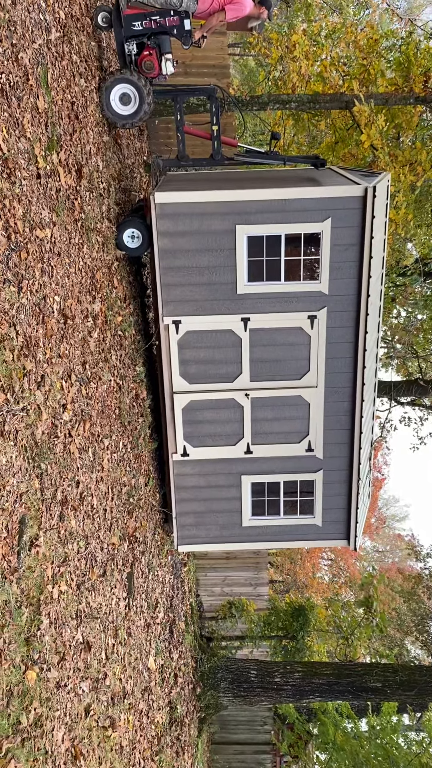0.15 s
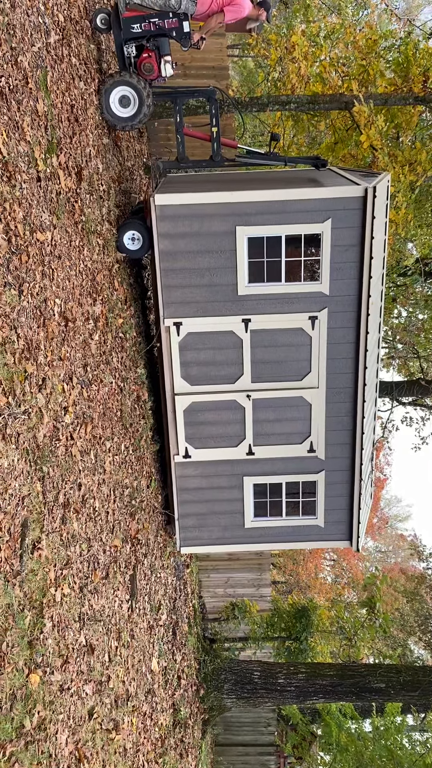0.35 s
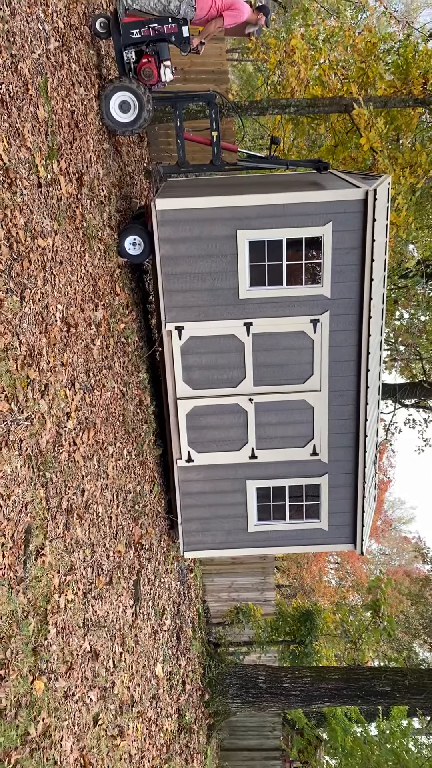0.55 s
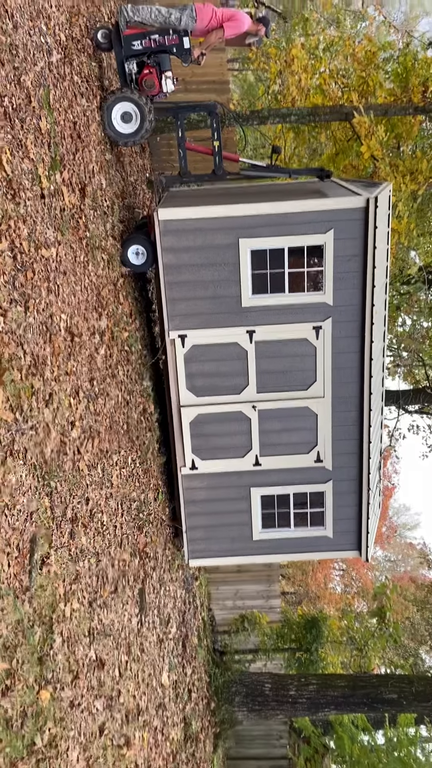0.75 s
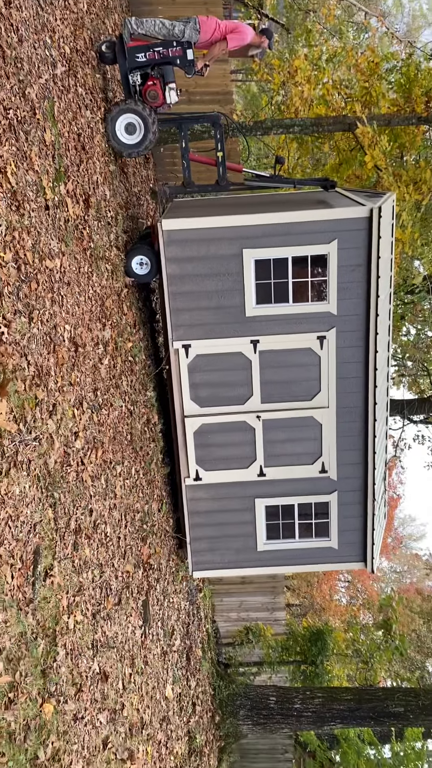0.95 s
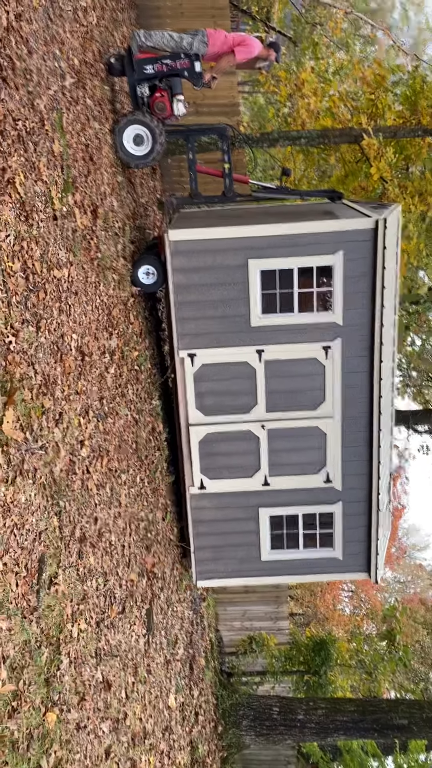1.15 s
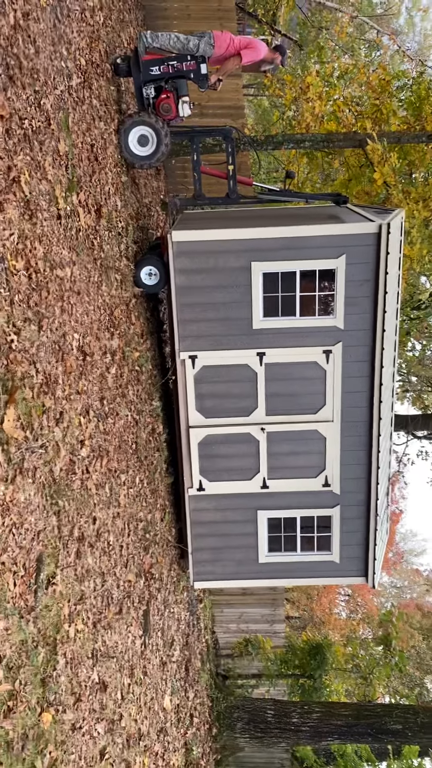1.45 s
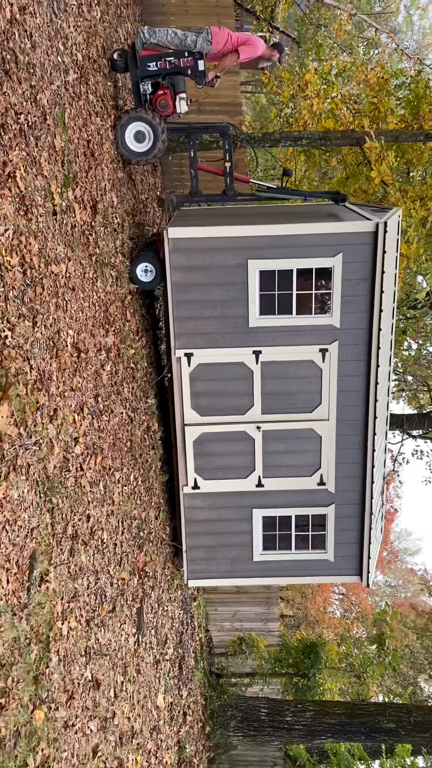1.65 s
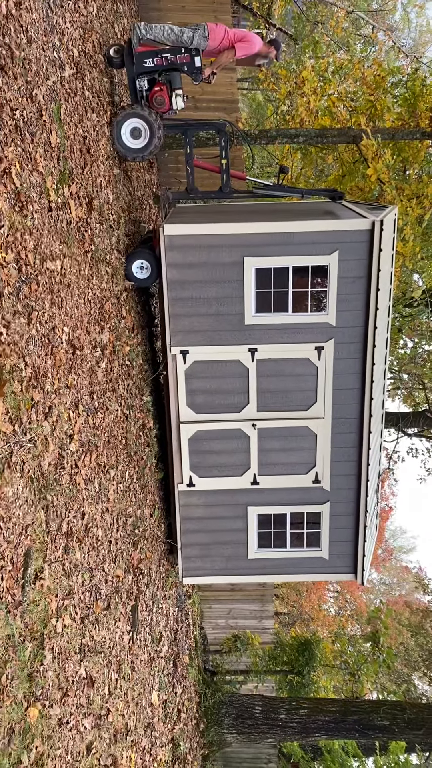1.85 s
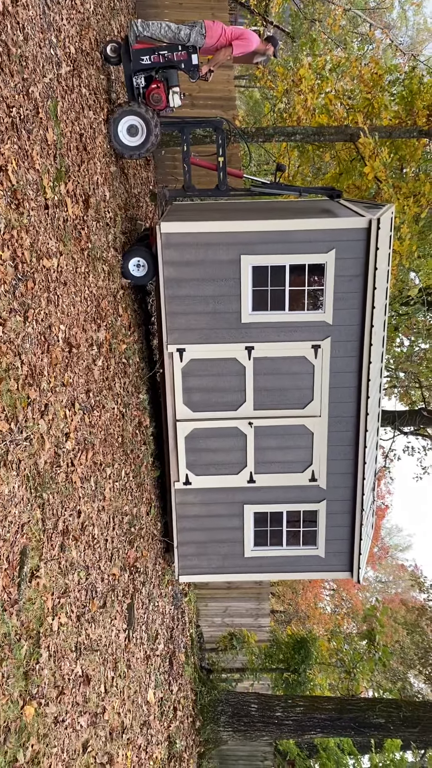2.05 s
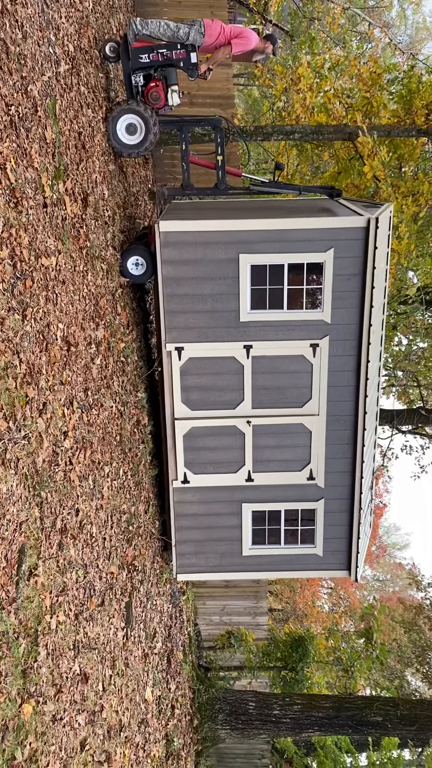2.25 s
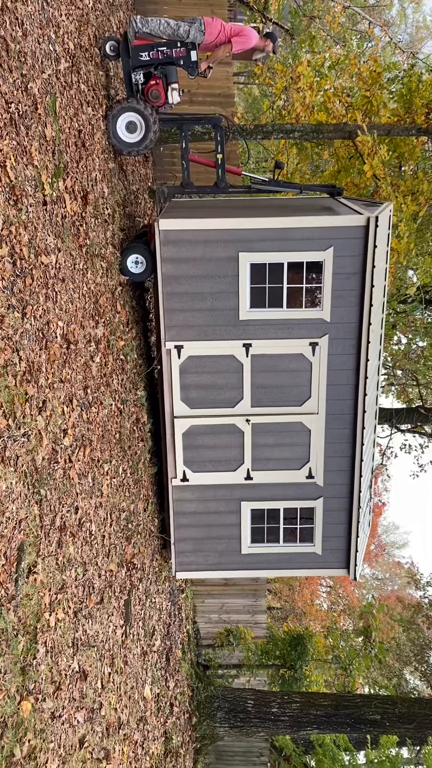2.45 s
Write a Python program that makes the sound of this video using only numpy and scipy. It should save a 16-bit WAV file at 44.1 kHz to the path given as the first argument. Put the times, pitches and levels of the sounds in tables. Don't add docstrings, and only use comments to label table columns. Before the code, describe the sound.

Outdoors in a leafy yard, a compact tractor-like mover holds one engine speed throughout, humming and whining with metal rattle and airy rush; a low knock comes early, leaf snaps are scattered, and breeze buffets the handheld microphone.

```python
import sys
import numpy as np
from scipy import signal
from scipy.fft import rfft, irfft
from scipy.io import wavfile
from scipy.ndimage import uniform_filter1d

SR = 44100
rng = np.random.default_rng(int(sys.argv[2]) if len(sys.argv) > 2 else 0)


def wrap_up_sound(samples):
    columns = np.atleast_2d(samples).T
    tamed = np.clip(columns, -1, 1)
    steps = np.round(tamed * 32767).astype(np.int16)
    wavfile.write(sys.argv[1], SR, steps)


def attenuation_scalar(level_db):
    decades = np.asarray(level_db, float) / 20
    return 10 ** decades


N = 114660


def rms_one(x):
    return x / np.sqrt(np.mean(x ** 2) + 1e-20)


def curve(rows):
    time_s, value = np.transpose(rows)
    return np.interp(np.arange(N) / SR, time_s, value)


def at_hz(points, hz):
    point_hz, value = np.transpose(points)
    return np.interp(np.log(hz + 1), np.log(point_hz), value)


def drift(rate_hz):
    r = np.exp(-2 * np.pi * rate_hz * 40 / SR)
    white = rng.standard_normal(N // 40 + 2002)
    slow = signal.lfilter([1], [1, -2 * r, r * r], white)[2000:]
    return np.interp(np.arange(N) / 40, np.arange(len(slow)), rms_one(slow))


def resonate(x, hz, width_hz):
    r = np.exp(-np.pi * width_hz / SR)
    poles = [1, -2 * r * np.cos(2 * np.pi * hz / SR), r * r]
    return signal.lfilter([1, 0, -1], poles, x + 1e-18)


def cut(x, hz, kind, order=2):
    sos = signal.butter(order, np.clip(hz, 10, .45 * SR), kind, fs=SR, output="sos")
    return signal.sosfilt(sos, x)


FIRINGS_HZ, FIRST_FIRING_S = 19.3121, .00978
# time in seconds, crank lateness in ms.
CRANK_LATE = [(0, .4), (.11, .65), (.18, 1.25), (.28, 1.1), (.47, -.75), (.95, -.8), (1.15, -.5),
              (1.2, .55), (1.4, 1.15), (1.52, .3), (1.72, -.35), (1.95, 0), (2.23, -.6), (2.3, -.1),
              (2.5, .95), (2.6, 1.0)]


def cycles():
    late_s = uniform_filter1d(curve(CRANK_LATE), size=3000, mode="nearest") / 1000
    return (np.arange(N) / SR - late_s - FIRST_FIRING_S) * FIRINGS_HZ


def per_cycle(turn, spread_db):
    strength_db = spread_db * rng.standard_normal(61)
    return attenuation_scalar(np.interp(turn, np.arange(-1, 60), strength_db))


# multiple of the firing rate, level in dB.
EXHAUST_ORDERS = [(2, -54.5), (3, -52.5), (4, -38), (5, -30), (6, -38), (7, -39), (8, -33), (9, -36.5),
                  (10, -43.5), (11, -29.5), (12, -34), (13, -35), (14, -44), (15, -46), (16, -45.5),
                  (20, -52.5)]
# time in seconds, level in dB.
BOOM_LOAD = [(0, -7.5), (.15, -5), (.3, 0), (.6, -1.5), (1.2, .5), (1.9, 0), (2.6, 0)]
SILENCER_CHAMBERS = [(3, 2.7, 2.8), (5, 5.5, .7), (6, 5, 1.9), (10, 7, .24), (13, 12.2, .47), (20, 15, .1)]
FIRING_SPREAD_DB, ORDER_WANDER, BOOM_TOP_ORDER = 1.3, .19, 6


def exhaust(turn):
    out, load = 0, attenuation_scalar(curve(BOOM_LOAD))
    for order, db in EXHAUST_ORDERS:
        _, centre, lag = next(c for c in SILENCER_CHAMBERS if order <= c[0])
        wobble = 1 + ORDER_WANDER * (drift(10) + 1j * drift(10))
        ring = np.exp(2j * np.pi * order * turn - 1j * lag * (order - centre))
        boom = load if order <= BOOM_TOP_ORDER else 1
        out = out + attenuation_scalar(db) * boom * np.real(wobble * ring)
    return np.sqrt(2) * out * per_cycle(turn, FIRING_SPREAD_DB)


# multiple of the firing rate (rounded when played), level in dB, wander as a fraction.
PUMP_TONES = [
    (40, -40, 0.32),
    (41, -50, 0.58),
    (79.5, -77, 0.25),
    (118, -53, 0.34),
    (160, -51.5, 0.98),
]
WHINE_THROB_DB, WHINE_TOP_MS = 1, 35.5


def whine(turn):
    out = 0
    for order, db, wander in PUMP_TONES:
        wobble = 1 + wander * (drift(38) + 1j * drift(38))
        tone = np.exp(2j * np.pi * np.round(order) * turn)
        out = out + attenuation_scalar(db) * np.real(wobble * tone)
    throb = np.cos(2 * np.pi * (turn - WHINE_TOP_MS * FIRINGS_HZ / 1000))
    return np.sqrt(2) * out * attenuation_scalar(WHINE_THROB_DB * throb)


# delay after firing in ms, puff decay in ms, puff in dB, tick in dB.
VALVE_EVENTS = [
    (3.79, 8.0, 15, -1.5),
    (20.36, 3.6, 12, 0),
    (27.9, 3.0, -12.5, -6.5),
    (41, 4.0, 8.5, -17),
]
VALVE_SPREAD_DB = 3.0


def valve_gates(turn):
    puff, tick = np.zeros(N), np.zeros(N)
    for delay_ms, length_ms, puff_db, tick_db in VALVE_EVENTS:
        age_ms = ((turn - delay_ms * FIRINGS_HZ / 1000) % 1) * 1000 / FIRINGS_HZ
        strength = per_cycle(turn, VALVE_SPREAD_DB) * (1 - np.exp(-age_ms / 1.3))
        puff += attenuation_scalar(puff_db) * strength * np.exp(-age_ms / length_ms)
        tick += attenuation_scalar(tick_db) * strength * np.exp(-age_ms / 3.3)
    return puff, tick


PUFF_DB, PUFF_LOW_HZ, PUFF_HIGH_HZ, TICK_DB = -43.5, 7600, 10700, -58.5


def valves(puff, tick):
    air = rms_one(cut(rng.standard_normal(N) * puff, PUFF_LOW_HZ, "high"))
    metal = rms_one(cut(rng.standard_normal(N) * tick, [2500, 6500], "band"))
    return attenuation_scalar(PUFF_DB) * cut(air, PUFF_HIGH_HZ, "low") + attenuation_scalar(TICK_DB) * metal


# frequency in Hz, width in Hz, level in dB.
COWL_MODES = [(366.6, 31, -37), (429.5, 11.7, -45), (652, 70, -49.5), (828, 75, -46), (1046, 110, -47.5),
              (1208, 8.5, -50.5), (1352, 87, -45), (1520, 23, -66), (2132, 13, -56.5), (2387, 57, -51.5),
              (2940, 110, -49), (3083, 390, -44), (3840, 30, -52.5), (5134, 160, -51)]
# time in seconds, level in dB.
GROUND_SHAKE = [(0, -2), (.15, -0.5), (.3, -6.5), (.58, 0), (.78, 0.5), (1.1, -7), (1.35, 1), (1.55, -0.5),
                (1.85, 0.5), (2.15, -2), (2.35, -1.5), (2.55, 0)]
SHAKE_TOP_HZ = 1600


def cowl(tick):
    out, shake_db = 0, curve(GROUND_SHAKE)
    for hz, width_hz, db in COWL_MODES:
        drive = rng.standard_normal(N) * (1 + 0.9 * tick)
        level_db = db + 1.15 * drift(8.9) + shake_db * (hz < SHAKE_TOP_HZ)
        out = out + attenuation_scalar(level_db) * rms_one(resonate(drive, hz, width_hz))
    return out


# frequency in Hz, density in dB per Hz.
RUSH_SPECTRUM = [(60, 11), (250, 7), (520, -8), (1200, 0.5), (1800, -6), (4500, -12), (8000, -10),
                 (15500, -25.5)]
RUSH_DB = -34


def rush(tick):
    out, together = 0, drift(3)
    edges_hz = 50 * 2 ** np.arange(0, 8.6, .5)
    white = rng.standard_normal((2, N)) * (1 + .5 * tick)
    for k, (low, high) in enumerate(zip(edges_hz, edges_hz[1:])):
        level_db = at_hz(RUSH_SPECTRUM, np.sqrt(low * high))
        gain = attenuation_scalar(level_db + 1.4 * together + 1.4 * drift(6.5))
        out = out + gain * cut(white[k % 2], [low, high], "band")
    return attenuation_scalar(RUSH_DB) * rms_one(out)


# start in seconds, level in dB, pitch in Hz, t60 in seconds.
AXLE_BUMPS = [
    (0.358, -14, 91, .12),
    (0.822, -28, 147, 0.077),
    (1.19, -36, 81, .12),
]


def bumps():
    out, time_s = 0, np.arange(N) / SR
    for start_s, db, hz, t60_s in AXLE_BUMPS:
        age_s = np.maximum(time_s - start_s, 0)
        envelope = attenuation_scalar(db - 60 * age_s / t60_s) * (1 - np.exp(-age_s / .012))
        out = out + envelope * np.sin(2 * np.pi * hz * age_s)
    return out


# start in seconds, level in dB.
LEAF_SNAPS = [
    (.115, -37),
    (.43, -32),
    (.635, -28.5),
    (0.951, -48),
    (2.09, -42),
    (2.29, -27.5),
]
LEAVES_PER_S, LEAVES_DB = 150, -65


def leaves():
    sizes = attenuation_scalar(6.3 * np.minimum(rng.exponential(1, N), 5)) * rng.choice([-1, 1], N)
    born = rng.random(N) < LEAVES_PER_S * attenuation_scalar(5 * drift(6)) / SR
    out = attenuation_scalar(LEAVES_DB) * rms_one(sizes * born)
    decay = np.exp(-np.arange(400) / SR / .002)
    for start_s, db in LEAF_SNAPS:
        i = int(start_s * SR)
        out[i:i + 400] += attenuation_scalar(db) * rng.standard_normal(400) * decay
    return cut(out, 3000, "high")


# time in seconds, level in dB.
BREEZE = [(0.0, -69), (0.48, -54), (0.65, -59), (0.8, -33.5), (1.95, -41.5), (2.5, -36), (2.6, -39)]
WIND_TOP_HZ = 74.4


def wind():
    gusts = cut(rng.standard_normal(N), [42, WIND_TOP_HZ], "band")
    return attenuation_scalar(curve(BREEZE)) * rms_one(cut(gusts, 36, "high"))


# frequency in Hz, phase in radians.
PORT_LEAD = [(700, 0), (1100, -.8), (3200, 1.4), (5250, .15), (7150, 3.14), (10700, 6.28), (12900, 9.2),
             (16000, 11.2)]
# frequency in Hz, left minus right in dB.
PORT_SPLIT = [(380, 0), (720, .3), (1290, -.6), (4400, -.6)]
# frequency in Hz, level in dB.
PORT_SCATTER = [(60, -15), (200, -26), (500, -12), (780, -21), (1200, -11), (2000, -12), (3500, -7),
                (8000, -13)]


def ports(x):
    hz, spec = np.fft.rfftfreq(N, 1 / SR), rfft(x)
    half_lead = np.interp(hz, *np.transpose(PORT_LEAD)) / 2
    tilt = attenuation_scalar(at_hz(PORT_SPLIT, hz) / 2)
    echoes = rng.standard_normal(8000) * np.exp(-np.arange(8000) / SR / .04)
    scatter = rfft(echoes / np.linalg.norm(echoes), N) * attenuation_scalar(at_hz(PORT_SCATTER, hz))
    left = tilt * np.exp(1j * half_lead) + scatter
    right = np.exp(-1j * half_lead) / tilt - scatter
    return np.array([irfft(spec * left, N), irfft(spec * right, N)])


def scene():
    turn = cycles()
    puff, tick = valve_gates(turn)
    machine = exhaust(turn) + whine(turn) + valves(puff, tick) + cowl(tick) + rush(tick) + bumps()
    leaf_pan = attenuation_scalar(np.array([[1], [-9]]))
    return ports(machine) + wind() + leaves() * leaf_pan


# frequency in Hz, level relative to the other in dB.
WEAKER_BAR = [(2000, -12), (5300, -12), (6200, -3), (7600, -7), (9500, -2.5), (12000, -3.5), (15000, -4)]
FAINT_DB, FICKLE_DB, CUTOFF_HZ = -76.5, 1.3, 15600


def mute_weak_bands(x):
    hz, _, spec = signal.stft([x[0] + x[1], x[0] - x[1]], SR, nperseg=2048, noverlap=1024)
    starts = np.r_[0, 72:128:8, 128:1025:16]
    widths = np.diff(np.r_[starts, 1025])
    power = np.add.reduceat(np.abs(spec) ** 2, starts, axis=1) / widths[:, None]
    bar_db = at_hz(WEAKER_BAR, hz[starts])[:, None] + FICKLE_DB * rng.standard_normal(power.shape[2])
    keep = (power > attenuation_scalar(2 * bar_db) * power[::-1]) & (power > attenuation_scalar(2 * FAINT_DB))
    keep[:, 0] = True
    keep[0, :17] = True
    mask = np.repeat(keep, widths, axis=1) * (hz < CUTOFF_HZ)[:, None]
    mid, side = signal.istft(spec * mask, SR, nperseg=2048, noverlap=1024)[1][:, :N]
    return np.array([mid + side, mid - side]) / 2


def top_cut(x):
    return signal.sosfilt(signal.butter(12, 16920, fs=SR, output="sos"), x)


def record(dry):
    fade_s, fade_db = 0.034, -1
    left_s = (N - np.arange(N)) / SR
    fade = attenuation_scalar(fade_db * np.clip(1 - left_s / fade_s, 0, 1))
    mix = mute_weak_bands(dry * fade)
    return top_cut(mix)


dry = scene()
out = record(dry)
wrap_up_sound(out)
```